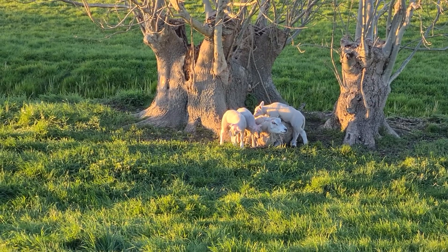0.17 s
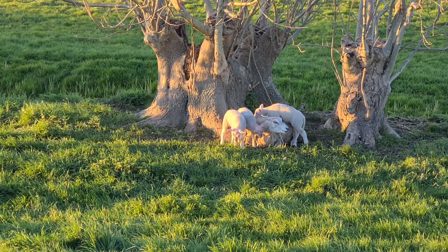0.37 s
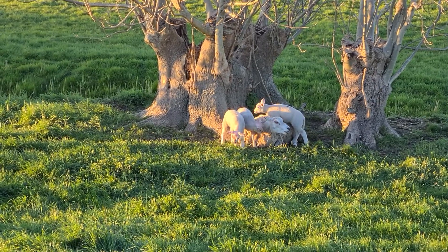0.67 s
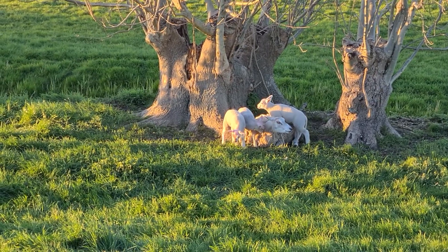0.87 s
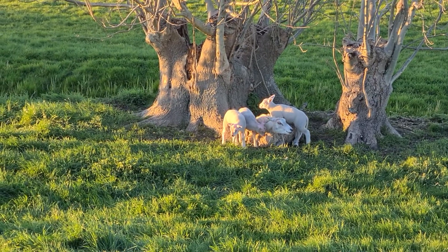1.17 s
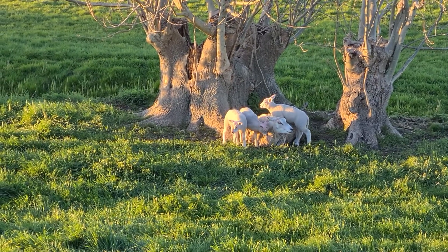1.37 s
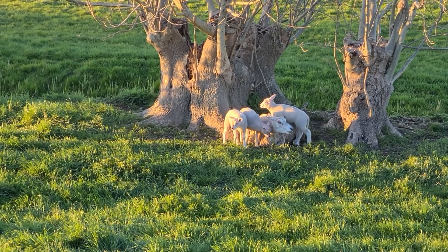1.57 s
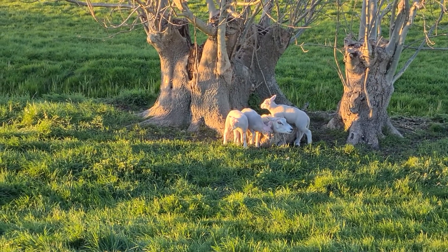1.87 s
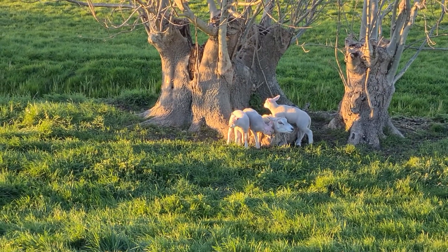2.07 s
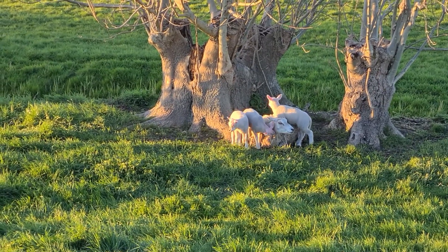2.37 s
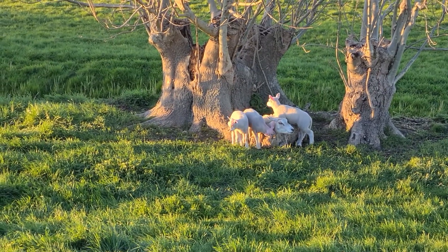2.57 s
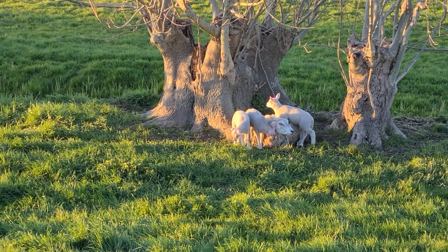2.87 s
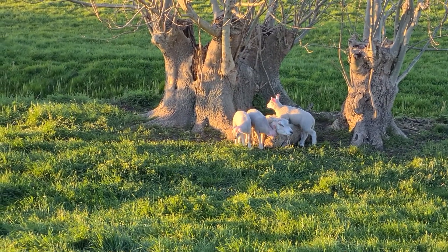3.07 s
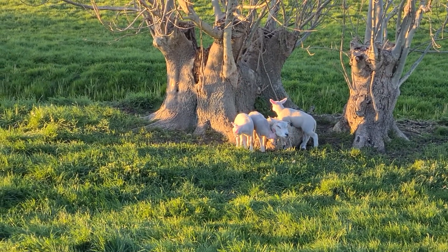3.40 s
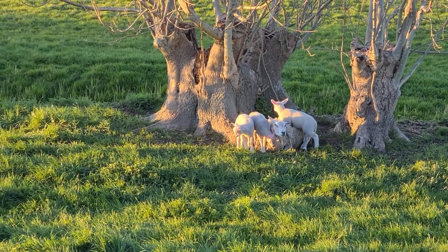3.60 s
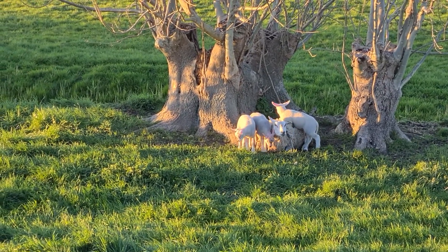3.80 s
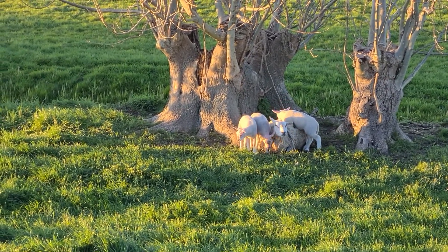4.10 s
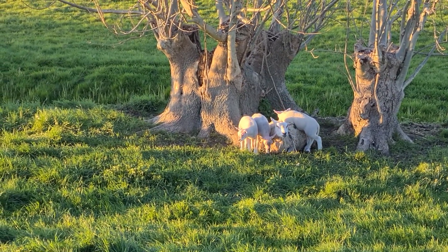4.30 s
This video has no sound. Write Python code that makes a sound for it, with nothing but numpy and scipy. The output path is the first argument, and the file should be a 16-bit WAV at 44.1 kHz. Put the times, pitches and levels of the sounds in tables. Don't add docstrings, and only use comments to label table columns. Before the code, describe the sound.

Low wind buffeting swells and drops on a hand-held phone outdoors, hitting the left side harder, over faint traffic, dry ticks and early bird chirps.

```python
import sys
import numpy as np
from scipy import signal
from scipy.fft import rfft, irfft, next_fast_len
from scipy.io import wavfile
from scipy.ndimage import uniform_filter1d

SR = 44100
rng = np.random.default_rng(int(sys.argv[2]) if len(sys.argv) > 2 else 0)


def bounce(signal):
    frames = np.transpose(np.atleast_2d(signal))
    limited = np.clip(frames, -1, 1)
    pcm = np.round(limited * 32767).astype(np.int16)
    wavfile.write(sys.argv[1], SR, pcm)


def level_to_linear(level):
    exponent = np.asarray(level, float) / 20
    return 10 ** exponent


N = 196156
TIME = np.arange(N) / SR
FREQ = np.fft.rfftfreq(N, 1 / SR)

# (start [s], length [s], broad level [dB], rumble level [dB])
JETS = [(0.057, .03, -48.5, -29), (0.164, 0.03, -46.5, -38), (0.684, 0.033, -42.5, -35.5),
        (1.475, 0.041, -35, -24.5), (1.585, 0.056, -39.5, -22.5), (1.715, 0.032, -34, -19.5),
        (1.767, 0.056, -36.5, -31.5), (1.929, 0.025, -43, -36), (2.062, 0.028, -40, -34),
        (2.507, .035, -37.5, -29), (3.037, 0.027, -36.5, -24.5), (3.626, 0.027, -34.5, -24.5),
        (3.715, 0.032, -36.5, -31), (3.85, .055, -38, -20), (3.919, 0.073, -40.5, -20.5),
        (4.143, .03, -51.5, -28), (4.245, .03, -42.5, -36)]


def on_log(hz, values, at=FREQ):
    return np.interp(np.log(at + 1), np.log(np.array(hz) + 1), values)


def walk(rate):
    k = int(SR / rate)
    held = np.repeat(rng.standard_normal(N // k + 1), k)
    return 1.5214 * uniform_filter1d(uniform_filter1d(held, k), k)[:N]


def add(out, s, sound, db, pan_db):
    i = int(max(s, 0) * SR)
    out[:, i:i + len(sound)] += sound[:N - i] * level_to_linear(db + np.array([[pan_db], [-pan_db]]) / 2)


def fading(peak_s, fade_s, peak_db, faster=1):
    t = TIME[::64]
    power = 0
    for s, fade, db in zip(peak_s, fade_s, peak_db):
        fall_db = 10 * faster * np.abs((t - s) / fade) ** 1.5
        power = power + level_to_linear(db - fall_db) ** 2
    return np.interp(TIME, t, power)


def eddies(shape, likeness, even, smooth_s):
    hz, db = np.transpose(shape)
    a, b = irfft(rfft(rng.standard_normal((2, N))) * level_to_linear(on_log(hz, db)), N)
    pair = np.array([a, likeness * a + np.sqrt(1 - likeness ** 2) * b])
    envelope = np.abs(signal.hilbert(pair, next_fast_len(N))[:, :N])
    power = uniform_filter1d(envelope ** 2, int(smooth_s * SR))
    pair = pair / (power + 0.036 * power.mean()) ** (np.clip(even, 0, 1) / 2)
    return pair / pair.std(axis=1, keepdims=True)


def gusts():
    # (peak [s], fade by 10 dB [s], rumble [dB], flutter minus rumble [dB])
    gust_peaks = [(0, -0.0013, -29, -19), (.14, 0.1089, -27.5, -16.5), (.27, 0.0345, -29, -21),
                  (.44, 0.1353, -26.5, -12.5), (.55, 0.1365, -28, -6.5), (.64, 0.06, -27.5, -17.5),
                  (.73, 0.0748, -24, -8), (0.931, 0.0741, -30.5, -4.5), (.995, 0.0704, -21.5, -8),
                  (1.068, 0.08, -23.5, -7.5), (1.322, 0.0706, -27, -23), (1.431, -0.0401, -25.5, -10),
                  (1.2, 0.1103, -34, -20), (1.84, 0.0336, -24, -15.5), (1.946, 0.1736, -31.5, -1.5),
                  (2.11, 0.0471, -26.5, -15), (2.225, 0.0681, -24.5, -12), (2.32, 0.0683, -28.5, 3),
                  (2.534, 0.1559, -25.5, -12), (2.66, 0.147, -27, -14.5), (2.784, 0.0543, -24, -7.5),
                  (2.919, 0.0795, -25, -14.5), (3.114, 0.1908, -30.5, -26), (3.23, 0.1914, -31.5, -13),
                  (3.516, 0.0792, -29, -9.5), (3.77, 0.1031, -30.5, -14.5), (4.05, 0.1086, -26.5, -18),
                  (4.18, 0.0164, -22.5, -8), (4.259, 0.0378, -30.5, -6), (4.445, 0.3816, -30, -14.5)]
    # (frequency [Hz], density [dB per Hz])
    rumble_colour = [(15, -35.5), (25, -13.5), (40, -0.5), (55, 5.5), (70, 8.5), (90, 3), (115, -3.5),
                     (150, -22.5), (220, -61), (400, -92.5)]
    # (frequency [Hz], density [dB per Hz])
    flutter_colour = [(30, -61), (70, -24), (110, -6), (140, 5.5), (200, -1.5), (260, -11.5), (350, -21.5),
                      (480, -36), (800, -59.5), (1500, -97)]
    # (time [s], likeness of the ports [-1..1]); head-on is 1, crosswise negative
    wind_angle = [(0, 0.71), (.14, -.4), (.25, -.3), (.44, .9), (.6, .05), (.734, -.7), (.86, .4),
                  (.92, -0.23), (1.06, 0.9215), (1.4, 0.68), (1.8, .1), (2.03, .6), (2.3, .2), (2.47, .7),
                  (2.66, 1), (3.05, 0.95), (3.5, 0.9889), (4.45, 0.797)]
    lull_db, lull_flutter_db, flutter_faster = -40.5, -58.5, 2.0797
    jet_fade_s, jet_flutter_db, jet_right_db = 0.031, -12, -11

    s, fade_s, db, sharp_db = np.transpose(gust_peaks)
    start, length, _, jet_db = np.transpose(JETS)
    middle_s, spread_s = start + length / 2, jet_fade_s + length / 2
    leak = level_to_linear(np.array([[0], [jet_right_db]])) ** 2

    shared = level_to_linear(lull_db) ** 2 + fading(s, fade_s, db)
    jet = fading(middle_s, spread_s, jet_db)
    rumble_power = shared + jet * leak

    flutter_power = level_to_linear(lull_flutter_db) ** 2 + fading(s, fade_s, db + sharp_db, flutter_faster)
    jet_flutter = fading(middle_s, spread_s, jet_db + jet_flutter_db, flutter_faster)
    flutter_power = flutter_power + jet_flutter * leak

    alike = np.interp(TIME, *np.transpose(wind_angle)) * shared / rumble_power[0]
    alike = alike - .3 * jet / rumble_power[0]
    alike = np.clip(0.99933 * alike, -.99, .99)

    rumble = eddies(rumble_colour, alike, even=0.6528, smooth_s=.015) * np.sqrt(rumble_power)
    rumble = rumble * level_to_linear(-0.2758 + 1.2 * walk(22))
    flutter = eddies(flutter_colour, alike, even=0.16, smooth_s=0.014) * np.sqrt(flutter_power)
    return rumble + flutter * level_to_linear(-2.5 + 3.3902 * walk(40))


def thumps():
    # (time [s], peak [dB], ring [Hz], left minus right [dB])
    knocks = [
        (0.383, -24.5, 103, -10),
        (0.717, -40.5, 117, 4.5),
        (1.098, -20.5, 140.3, 1),
        (1.409, -23.5, 103.6, -8.5),
        (1.935, -20, 137, 4),
        (2.203, -18.5, 100, 2.5),
        (2.31, -19.5, 179.2, 4.5),
        (2.432, -26, 187.5, 1),
        (2.754, -29, 165.7, -2),
        (4.149, -21.5, 99.37, 10),
    ]
    out, t = np.zeros((2, N)), TIME[:SR // 20]
    for s, db, hz, pan_db in knocks:
        swing = np.sin(2 * np.pi * hz * t) * (t * hz / 0.5485) * np.exp(1 - t * hz / 0.6707)
        add(out, s, -swing, db - 4.0, pan_db)
    return out


def buffets():
    # (deepest swing [s], peak at mid pan [dB], frequency [Hz], length [cycles], left minus right [dB])
    rolls = [
        (1.5, -20.5, 65.53, 2.6, 11),
        (2.528, -19.5, 75.46, 0.7, 4.5),
        (2.787, -12, 128.21, 0.5244, 1.5),
        (1.05, -21, 174.27, 2.706, 0.5),
        (4.185, -25, 186, 3.7, 2),
        (3.651, -25.5, 56, 1.814, 11.5),
        (3.878, -23.5, 77, 3.6, 20),
    ]
    out = np.zeros((2, N))
    for s, db, hz, cycles, pan_db in rolls:
        u = np.arange(-.06 * SR, .06 * SR) / SR * hz
        add(out, s - .06, -np.cos(2 * np.pi * u) * np.exp(-(2 * u / cycles) ** 2), db, pan_db)
    return out


def snaps():
    # (time [s], peak [dB], ring [Hz])
    edge_snaps = [
        (3.046, -37, 494),
        (3.845, -32.5, 830),
        (3.853, -37, 643),
        (3.943, -38.5, 655),
    ]
    out, t = np.zeros((2, N)), TIME[:SR // 20]
    for s, db, hz in edge_snaps:
        swing = np.sin(2 * np.pi * hz * t) * (t * hz / 0.6036) ** 2 * np.exp(2 - 2 * t * hz / 0.6224)
        add(out, s, swing, db, 12.0)
    return out


def puffs():
    # (frequency [Hz], density [dB per Hz])
    jet_colour = [(60, -29.5), (120, 3), (200, -7), (300, -4.5), (450, -13.5), (700, -21), (1000, -23),
                  (1500, -38.5), (2300, -77)]
    hz, db = np.transpose(jet_colour)
    gate = np.zeros(N)
    for s, length, level_db, _ in JETS:
        gate[int(s * SR):int((s + length) * SR)] = level_to_linear(level_db)
    k = int(0.0016 * SR)
    gate = uniform_filter1d(uniform_filter1d(gate, k), k)
    air = irfft(rfft(rng.standard_normal(N)) * level_to_linear(on_log(hz, db)), N)
    ragged = air / air.std() * gate * level_to_linear(0.83 * walk(90))
    return ragged * level_to_linear(np.array([[0], [-16.0]]))


def flicker(spectrum, lo_hz, hi_hz, swell_db, quick_db):
    out, swell, octave = 0, walk(0.57), np.log2(FREQ + 1)
    for centre in np.arange(np.log2(lo_hz), np.log2(hi_hz), 1 / 3):
        swell = 0.66 * swell + 0.9 * walk(1.8)
        window = np.cos(np.clip(3 * (octave - centre), -1, 1) * np.pi / 2) ** 2
        band = irfft(spectrum * window, N)
        out = out + band * level_to_linear(swell_db * swell + quick_db * walk(9))
    return out


def road():
    # (frequency [Hz], left [dB per Hz], right [dB per Hz], likeness [0..1])
    road_colour = [(100, -75, -73.5, 1), (253.75, -73.5, -74, 0.9), (412.94, -74.5, -74.5, 0.9),
                   (495.05, -82.5, -80, 0.7), (630.47, -77, -74.5, 0.7), (758.54, -76, -74, 0.9),
                   (951.38, -81.5, -81.5, 0.5), (1089.3, -79, -76, 0.5), (1338.4, -83.5, -83, 0.3),
                   (1575.3, -94, -94.5, 0.1), (1874.5, -90.5, -93, 0.5), (1960.8, -94.5, -99, 0.2),
                   (2264.9, -104, -108, 0.04), (2600, -116, -116, 0)]
    # (frequency [Hz], lag [rad])
    left_lag = [(250, 0), (430, .45), (780, .6), (860, 1.2), (990, 2.5), (1120, 2.8), (1380, 3.1),
                (1550, 3.6), (1720, 6.9), (1940, 9.2), (2600, 11.7)]
    # (time [s], level [dB])
    traffic = [(0, 0), (.28, 0.5), (.38, -1), (1.71, 0.5), (2.59, -1), (2.65, 1.1281), (3.62, 0.7445),
               (3.8, -1), (3.86, 1), (4.45, -2.5)]
    hz, left_db, right_db, alike = np.transpose(road_colour)
    a, b = rfft(rng.standard_normal((2, N))) * np.sqrt(SR / 2)
    alike = np.clip(on_log(hz, alike), 0, .99)
    lag = on_log(*np.transpose(left_lag))
    left = alike * a * np.exp(-1j * lag) + np.sqrt(1 - alike ** 2) * b
    ports = np.array([left * level_to_linear(on_log(hz, left_db)), a * level_to_linear(on_log(hz, right_db))])
    roar = flicker(ports, 100, 2900, swell_db=.25, quick_db=1.4)
    swell_db = np.interp(TIME, *np.transpose(traffic))
    hum = irfft(rfft(roar) * on_log([900, 1100], [1, 0]), N)
    return hum * level_to_linear(swell_db) + (roar - hum) * level_to_linear(.7 * swell_db)


def scatter(x, t60_s, db):
    t = TIME[:SR // 3]
    decay = np.exp(-np.log(1000) * t / t60_s)
    tail = rng.standard_normal((2, len(t))) * decay * np.sqrt(14 / (t60_s * SR))
    return x + level_to_linear(db) * signal.fftconvolve(x, tail, axes=1)[:, :N]


def bird():
    # (time [s], length [s], middle pitch [Hz], peak [dB])
    sweeps = [(0.135, 0.0099, 3528, -67), (0.475, .016, 4750, -75.5), (.164, 0.015, 4844, -61.5),
              (0.168, .012, 3515, -67), (0.599, 0.014, 3894, -65), (0.91, .024, 3400, -78.5)]
    lilts = [(.124, 0.01722, 5500, -74), (.303, 0.017556, 4370, -76), (.31, .016, 3185, -76.5),
             (.805, 0.01608, 3618, -78), (.93, .016, 4233, -73.5), (.933, 0.0164, 3000, -72.5),
             (.972, .012, 3811, -79.5), (.984, .013, 2962, -69)]
    hooks = [
        (0, 0.010957, 4207, -57.5),
        (.141, .01, 4050, -64.5),
    ]
    arches = [(.41, .015, 4397, -66), (.176, .016, 5500, -65.5), (.179, .014, 4300, -64.5),
              (.489, .014, 4226, -66), (.493, 0.014, 5560, -72), (.787, 0.02865, 2890, -75),
              (1.497, 0.04284, 2110, -67.5)]
    falls = [(.15, 0.00963, 3270, -72), (.607, .012, 3141, -73.5), (1.274, .045, 2600, -68.5),
             (1.316, 0.02201, 2520, -69.5), (3.02, .07, 2720, -78)]
    glides = [(.84, 1.19), (.95, 1.06), (.95, .93), (.99, .95), (1.1, .9)]
    out = np.zeros((2, N))
    for notes, (start, end) in zip([sweeps, lilts, hooks, arches, falls], glides):
        for s, length, middle, db in notes:
            u = np.linspace(0, 1, int(length * SR))
            glide = start * (1 - u) * (1 - 2 * u) + 4 * u * (1 - u) + end * u * (2 * u - 1)
            whistle = np.sin(np.cumsum(2 * np.pi * middle * glide / SR))
            add(out, s, whistle * np.sin(np.pi * u) ** 0.8, db, 3.5)
    out = out * level_to_linear(3.5 * walk(300))
    return scatter(out, t60_s=.5, db=-11.0)


def twigs():
    # (time [s], peak [dB], treble minus peak [dB], left minus right [dB])
    ticks = [(.806, -62, -12, 5), (1.672, -60.5, -16, 3.5), (1.729, -68.5, -11.5, 9),
             (1.836, -60, -20.5, 0.5), (2.216, -74, -9, 13), (2.467, -59.5, -11, 9),
             (2.675, -67, -10.5, -1.5), (3.271, -66.5, -18.5, 4.5), (3.384, -71, -12.5, 0.5),
             (3.525, -65, -18.5, 7), (3.557, -69, -15, -0.5), (4.072, -71.5, -21.5, 7.5),
             (4.125, -66, -24, 5)]
    out, t = np.zeros((2, N)), TIME[:SR // 40]
    chance = rng.standard_normal((len(ticks), len(t)))
    low = signal.butter(2, [2300, 4800], "band", fs=SR, output="sos")
    high = signal.butter(4, [5300, 7500], "band", fs=SR, output="sos")
    for (s, db, treble_db, pan_db), noise in zip(ticks, chance):
        burst = noise * np.exp(-t / 0.0039) * (1 - np.exp(-t / 0.00031))
        burst = signal.sosfilt(low, burst) + level_to_linear(treble_db + 8.5) * signal.sosfilt(high, burst)
        add(out, s, burst / np.abs(burst).max(), db, pan_db)
    return scatter(out, t60_s=.12, db=-8.5)


def hiss():
    # (frequency [Hz], left [dB per Hz], right [dB per Hz])
    floor_colour = [(1800, -113, -113), (2600, -113, -113), (3554, -115, -117), (4300, -117, -119),
                    (5500, -121, -123), (6641, -119, -123), (7276.5, -118, -119), (7481.7, -124, -121),
                    (8067, -132, -130), (9458, -132, -132), (10390, -127, -127), (12250, -124, -126),
                    (14010, -125, -126), (15710, -127, -128)]
    hz, left_db, right_db = np.transpose(floor_colour)
    a, b = rfft(rng.standard_normal((2, N))) * np.sqrt(SR / 2)
    noise = np.array([a + .7 * b, a - .7 * b]) / np.hypot(1, .7)
    ports = noise * level_to_linear([on_log(hz, left_db), on_log(hz, right_db)])
    return flicker(ports, 2600, 18000, swell_db=.04, quick_db=.3)


def scene():
    wind = gusts() + thumps() + buffets() + snaps() + puffs()
    return wind + road() + bird() + twigs() + hiss()


def top_cut(x):
    return signal.sosfilt(signal.butter(12, 15720, fs=SR, output="sos"), x)


def record(dry):
    return top_cut(dry)


dry = scene()
out = record(dry)
bounce(out)
```